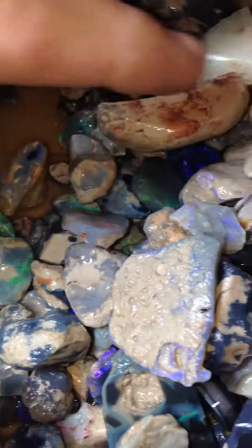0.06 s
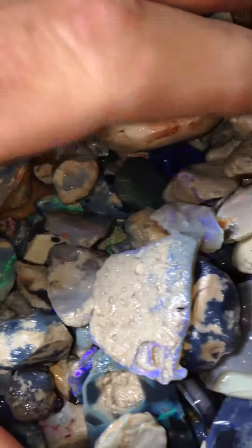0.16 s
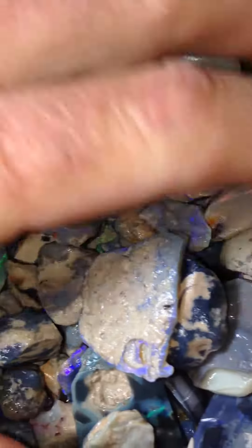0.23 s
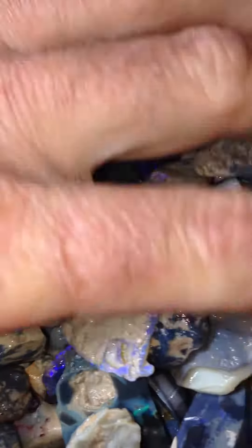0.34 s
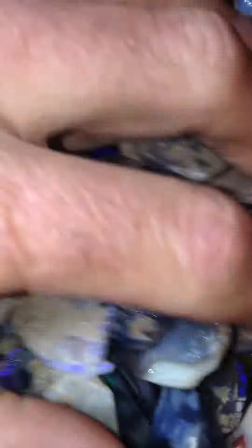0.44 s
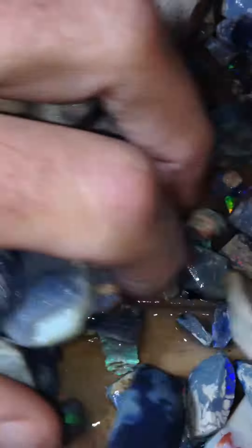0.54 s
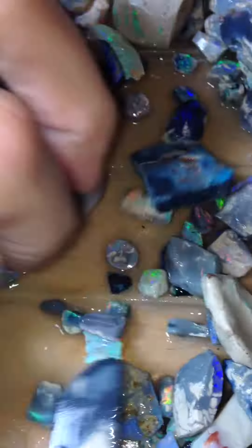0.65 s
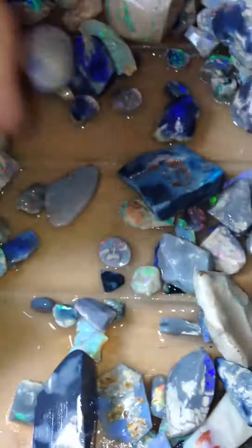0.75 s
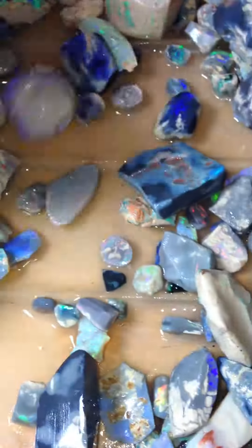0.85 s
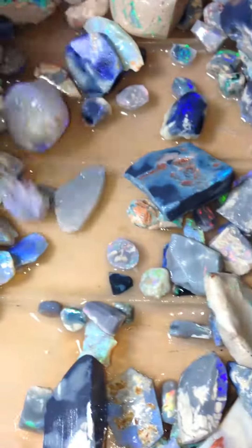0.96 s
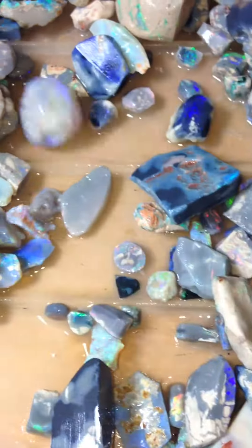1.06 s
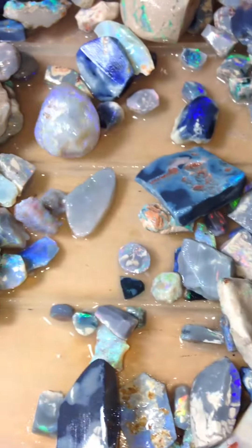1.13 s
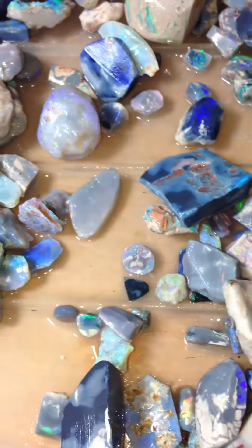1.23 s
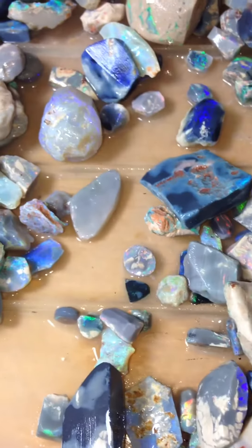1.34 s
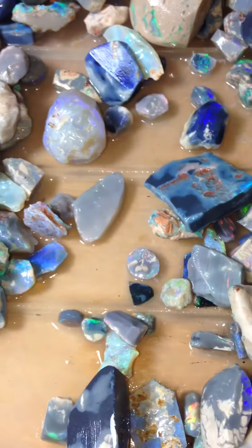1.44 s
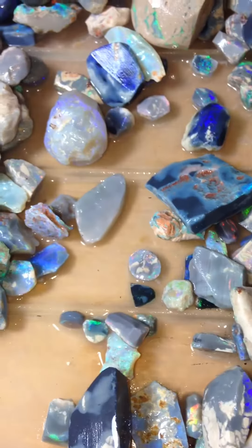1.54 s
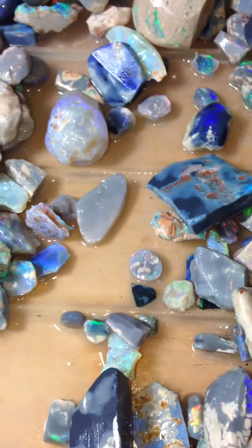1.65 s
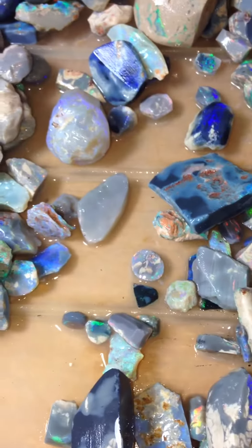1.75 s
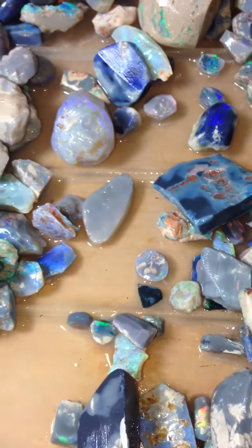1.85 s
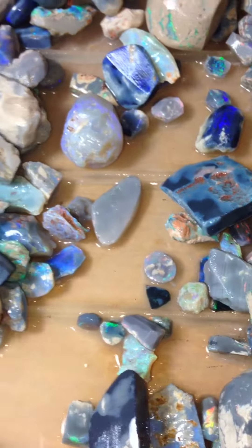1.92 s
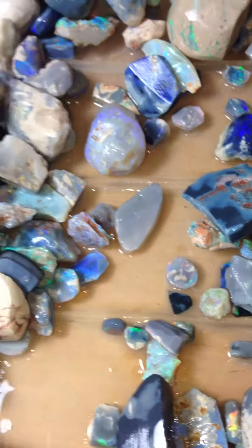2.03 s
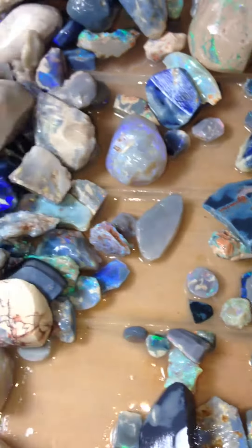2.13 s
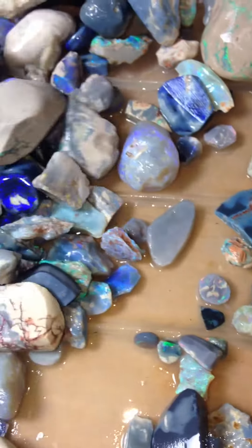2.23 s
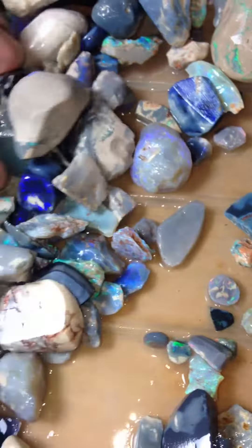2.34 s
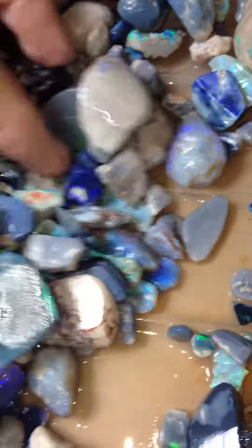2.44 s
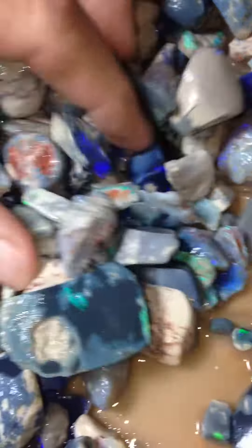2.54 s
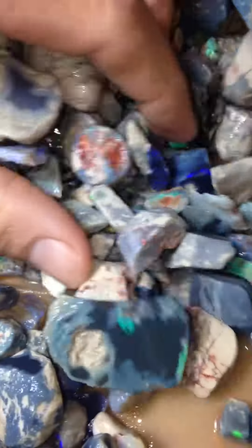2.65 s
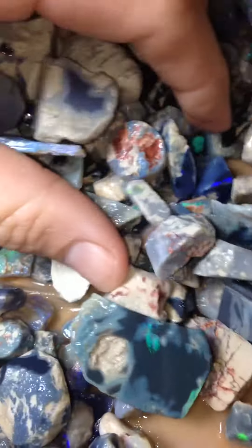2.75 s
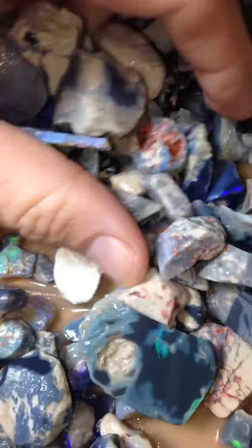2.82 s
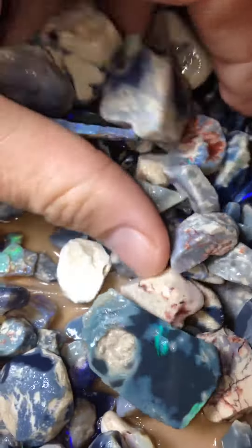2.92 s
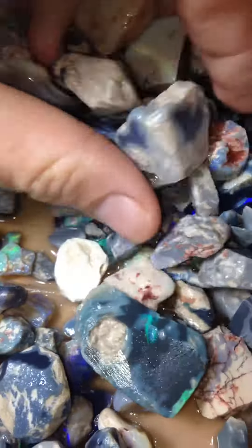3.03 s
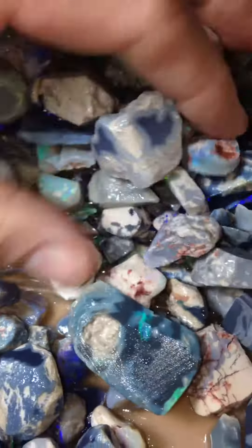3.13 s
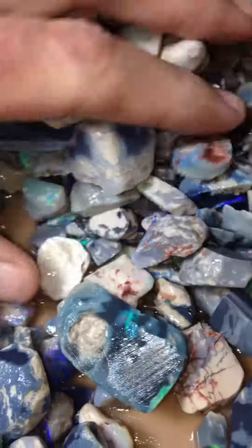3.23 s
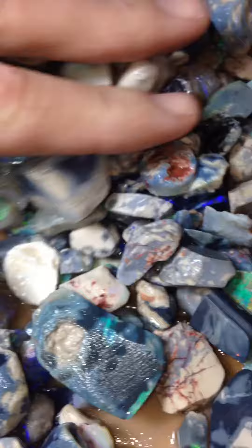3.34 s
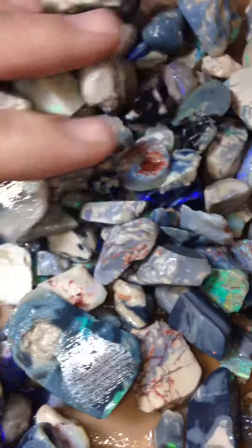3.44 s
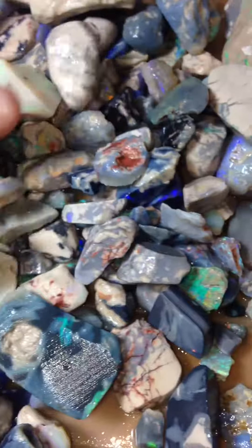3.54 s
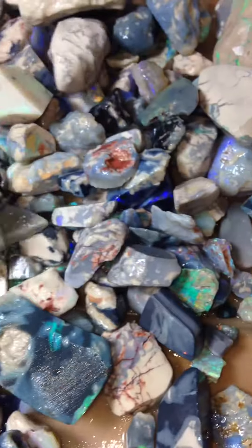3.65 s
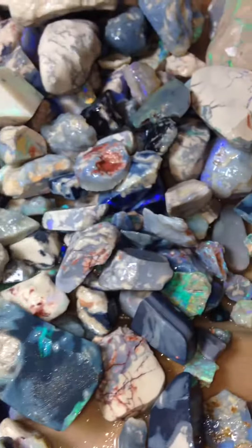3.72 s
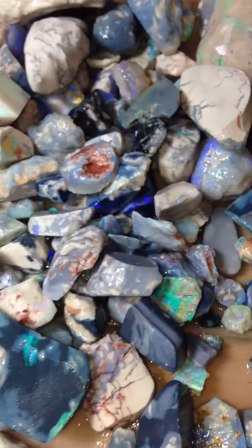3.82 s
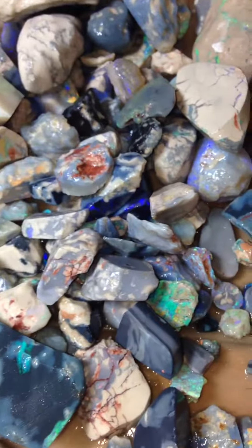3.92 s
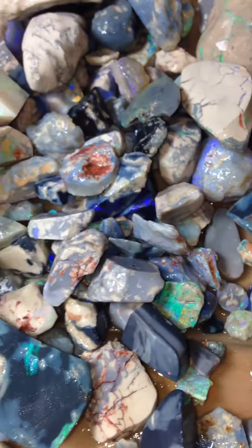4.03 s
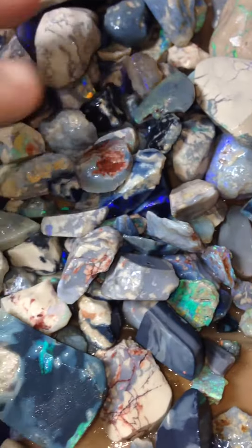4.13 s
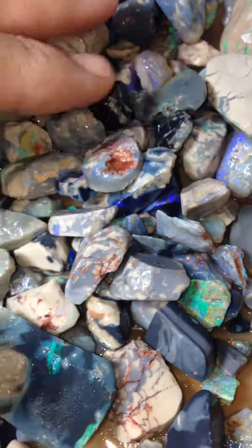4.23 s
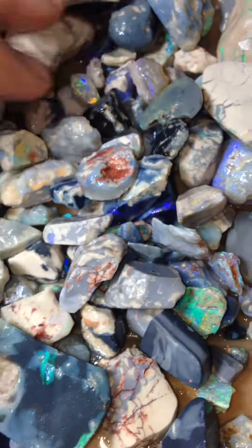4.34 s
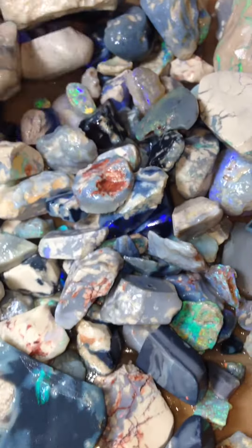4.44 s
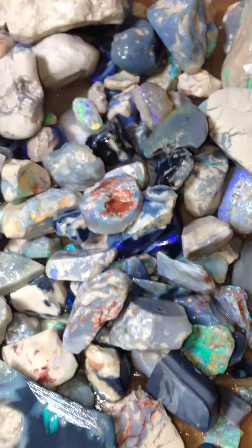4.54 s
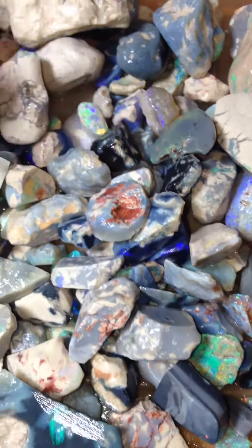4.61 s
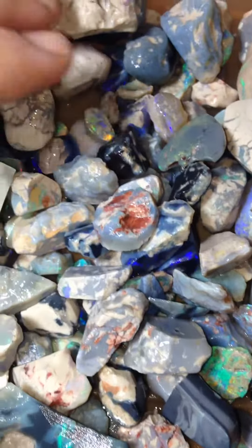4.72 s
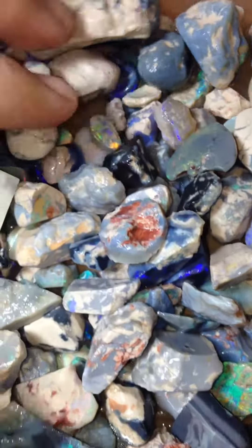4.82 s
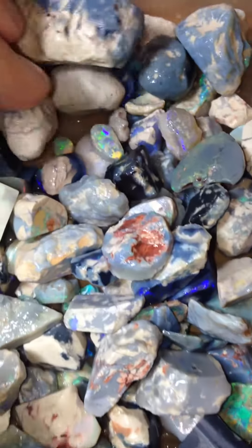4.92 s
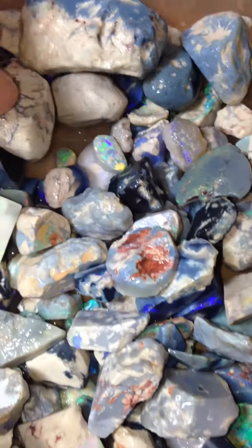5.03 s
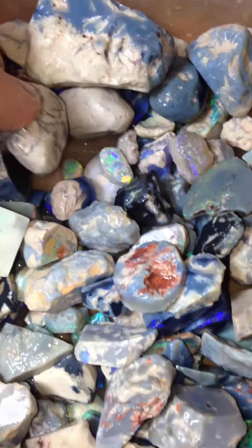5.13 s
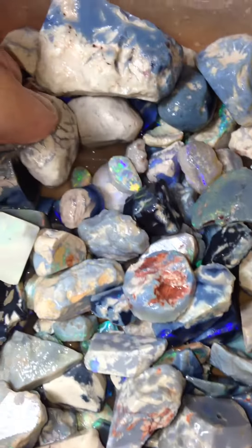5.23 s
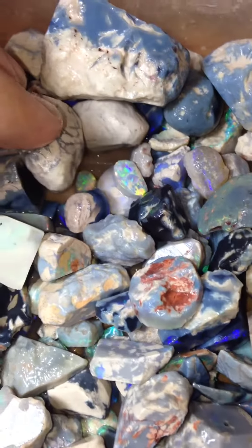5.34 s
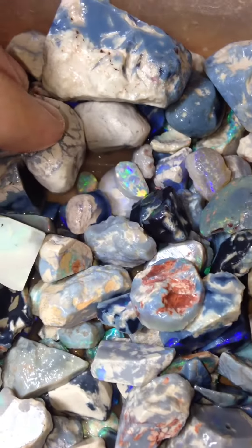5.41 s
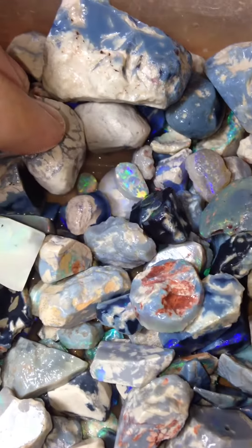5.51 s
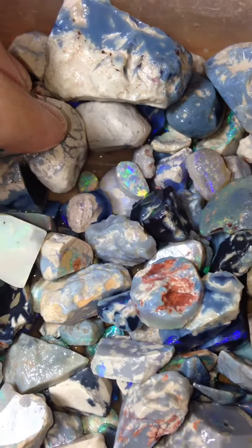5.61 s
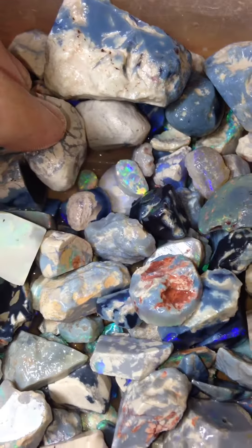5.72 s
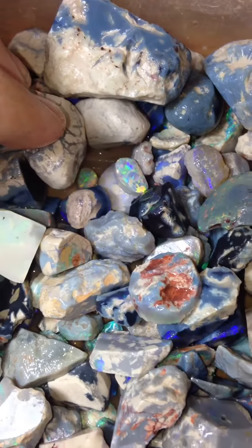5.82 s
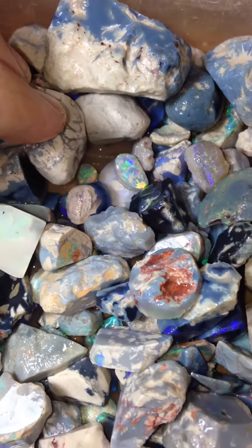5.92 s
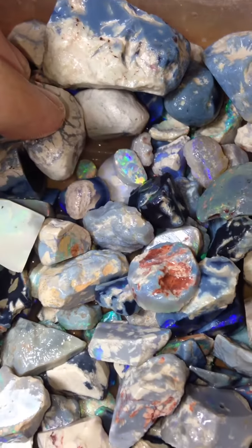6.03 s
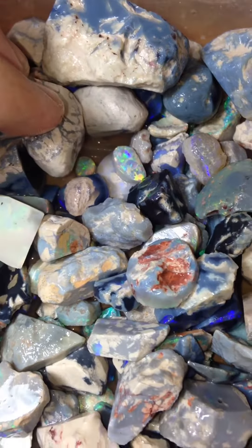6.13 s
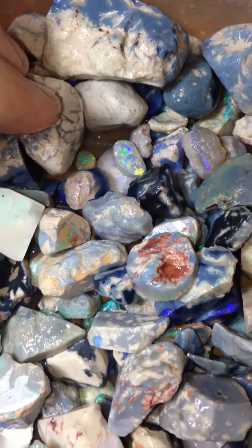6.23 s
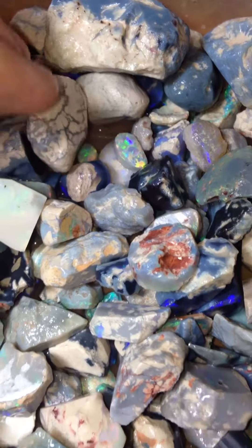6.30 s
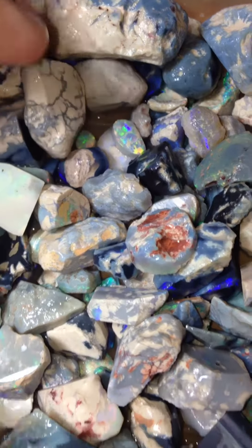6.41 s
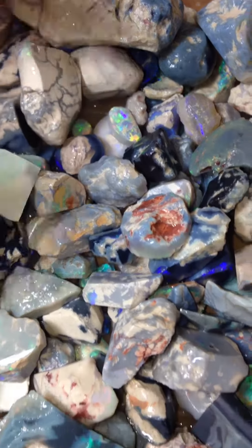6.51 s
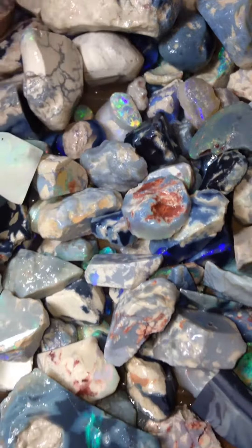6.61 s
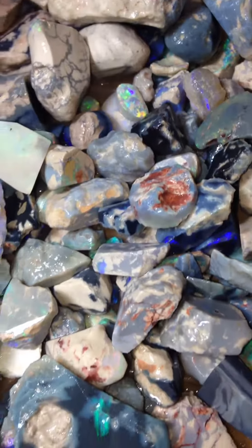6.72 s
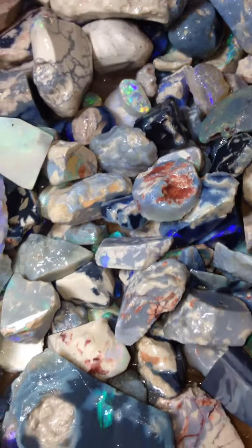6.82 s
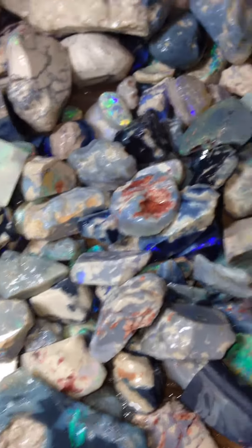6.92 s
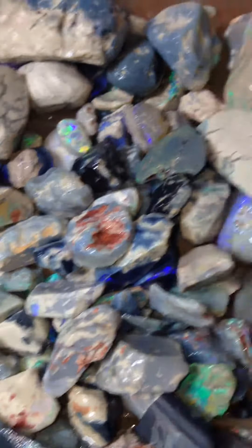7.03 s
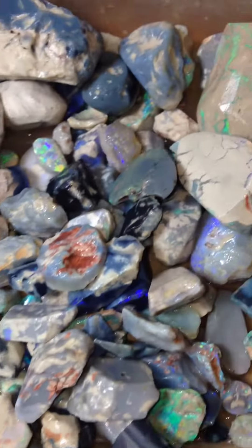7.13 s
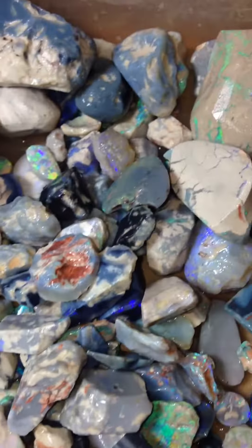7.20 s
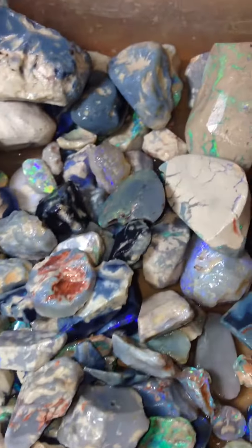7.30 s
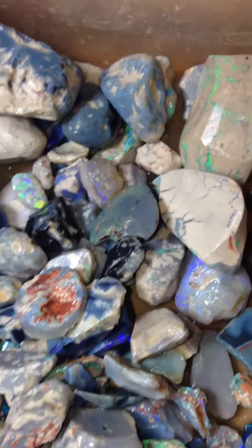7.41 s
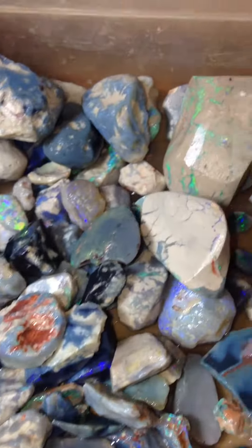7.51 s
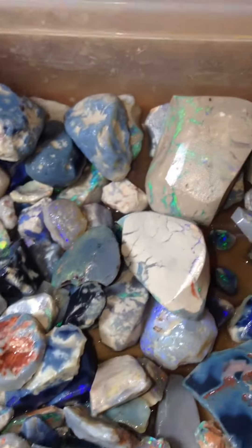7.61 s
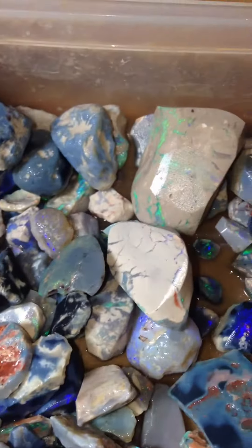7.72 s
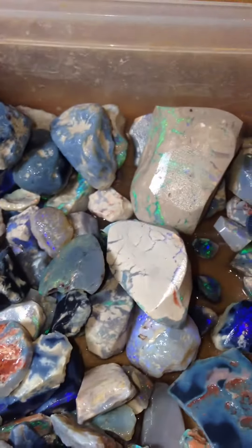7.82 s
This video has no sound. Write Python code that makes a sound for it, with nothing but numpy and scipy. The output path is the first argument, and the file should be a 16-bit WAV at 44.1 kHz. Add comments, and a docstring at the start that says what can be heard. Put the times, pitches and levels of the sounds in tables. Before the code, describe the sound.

Very close to a phone indoors, a hand rakes wet rough stones in a plastic tub. Short, uneven pushes make dense rattles of hard bright clicks over lower clacks, with an early scrape of the tub wall and a dull floor boom. After about four seconds the pushes become weaker and sparser, ending in near silence with a soft bump, one last stone tipping, and steady ventilation hum.

```python
"""A hand starts to rake through rough, wet stones in a plastic tub, close to a phone in a humming room.
Short pushes set off a dense rattle of tiny random clicks, with early scrapes of the ringing tub wall.
Single stones knock and click on top; from about 1 to 2.6 s a thin chip tinkles very high.
The tub's floor booms under them through damped resonances. After 4 s the hand slows to weaker nudges.
A soft bump comes through the phone's case, a last stone tips over, and the steady air noise hums on."""
import sys
import numpy as np
from scipy import signal
from scipy.fft import rfft, irfft
from scipy.io import wavfile
from scipy.ndimage import uniform_filter1d

SR = 44100
rng = np.random.default_rng(int(sys.argv[2]) if len(sys.argv) > 2 else 0)


def master(y):
    """Save y as 16-bit WAV."""
    cut = np.clip(np.atleast_2d(y).T, -1, 1)
    pcm = np.round(cut * 32767)  # scale
    wavfile.write(sys.argv[1], SR, pcm.astype(np.int16))


N = 346626
TIME = np.arange(N) / SR
RING = 2048  # length of one click [samples]


def undb(db):
    """Decibels to gain."""
    return 10 ** (np.asarray(db) / 20)


def unit(x):
    """Scale to an energy of one."""
    return x / np.sqrt(np.sum(x ** 2))


def fade(t60, size):
    """An exponential decay that loses 60 dB in t60 seconds."""
    return np.exp(-np.log(1000) * TIME[:size] / t60)


def swell(centre, length):
    """A smooth rise and fall around a moment."""
    return np.exp(-(2 * (TIME - centre) / length) ** 2)


def ring(x, response):
    """Pass a sound through an impulse response."""
    return signal.fftconvolve(x, response)[:N]


def octaves(size):
    """Log frequency of each bin of a transform."""
    return np.log2(np.maximum(np.fft.rfftfreq(size, 1 / SR), 1))


def colour(points, size):
    """A (frequency [Hz], level [dB]) spectrum on the bins of a transform."""
    hz, db = np.transpose(points)
    return np.interp(octaves(size), np.log2(hz), db)


def ripple(size):
    """A random, smooth course over frequency with a spread of one."""
    course = uniform_filter1d(uniform_filter1d(rng.standard_normal(size), size=30), size=20)
    return course / course.std()


def catching(rate):
    """Stones catch and slip: a random course through `rate` new values a second, within +-1.7."""
    steps = np.clip(rng.standard_normal(2000), -1.7, 1.7)
    return np.interp(TIME * rate, np.arange(len(steps)), steps)


def modes(table, size=16384):
    """The impulse response of a few damped resonances; neighbours swing in opposite senses."""
    t = TIME[:size]
    total = np.zeros(size)
    for k, (hz, db, t60) in enumerate(table):
        total += (-1) ** k * undb(db) * fade(t60, size=size) * np.sin(2 * np.pi * hz * t)
    return unit(total)


def pulse(db):
    """The sharpest causal pulse that has this spectrum (minimum phase, by folding the cepstrum)."""
    cepstrum = irfft(np.log(undb(db)))
    cepstrum[1:RING // 2] *= 2
    cepstrum[RING // 2 + 1:] = 0
    return unit(irfft(np.exp(rfft(cepstrum))))


def contact(db, uneven_db, scatter, scatter_t60, meet_s):
    """One stone's click: a pulse with peaks of its own, then scattered by the stones around it."""
    click = rfft(pulse(db + uneven_db * ripple(len(db))))
    # rough faces take a moment to meet, so each pitch starts at its own time
    lag_s = meet_s * (1.4 + np.tanh(ripple(len(db))))
    phase = -2 * np.pi * np.cumsum(lag_s) * SR / RING
    click = irfft(click * np.exp(1j * phase))[:RING // 2]
    echoes = scatter * unit(rng.standard_normal(RING) * fade(scatter_t60, size=RING))
    echoes[0] = 1  # the direct click
    return unit(signal.fftconvolve(click, echoes)[:RING])


# colour of the ventilation noise: (frequency [Hz], relative level [dB])
AIR_COLOUR = [(15, -37.5), (25, -14.5), (97, -5), (127, 0), (206, -9.5), (277, -1.5), (394, -12), (607, -9),
              (1230, -22.5), (1370, -20.5), (2050, -27), (2500, -23), (2900, -20), (3200, -27.5),
              (3820, -34), (14800, -48.5), (16000, -53)]


def air():
    """Steady ventilation noise: random noise shaped to a fixed spectrum."""
    noise = irfft(rfft(rng.standard_normal(N)) * undb(colour(AIR_COLOUR, size=N)), N)
    return undb(-53) * noise / noise.std()


def room(x, t60, wet_db, dull_hz):
    """A short, soft tail from the tub's sides and the room: decaying, dulled noise as an echo."""
    size = SR // 2
    tail = rng.standard_normal(size) * fade(t60, size=size)
    tail = tail * (TIME[:size] > .003)  # the first echo comes after 3 ms
    tail = signal.lfilter(*signal.butter(1, dull_hz, fs=SR), tail)
    return undb(wet_db) * ring(x, unit(tail))


# the hand shifts on the phone: (time [s], level [dB], pitch [Hz], length [s])
PHONE_BUMPS = [(6.251, -46, 70, 0.077)]


def handling():
    """Soft, deep bumps through the phone's case: a low sine under a smooth swell."""
    total = np.zeros(N)
    for s, db, hz, length in PHONE_BUMPS:
        total += undb(db) * swell(s, length) * np.sin(2 * np.pi * hz * (TIME - s))
    return total


# resonances of the tub's floor and walls: (pitch [Hz], relative level [dB], t60 [s])
TUB_MODES = [(122.3, 3, 0.29), (175, 1, 0.17), (411.7, -18, 0.04)]
# how firmly the stones press on the floor: (time [s], drive into the floor [dB])
FLOOR_PRESS = [(.35, -21), (.6, -23.5), (1.3, -18.5), (3.0, -21.5), (3.55, -10), (3.8, -17.5), (4.4, -17),
               (5.1, -9)]
TUB_SWAY_S = 0.00247  # delay per unit of random sway, which bends the pitch [s]


def tub(stones):
    """The plastic floor booms under the stones, its pitch wandering as their weight shifts."""
    press_db = np.interp(TIME, *np.transpose(FLOOR_PRESS))
    boom = ring(stones * undb(press_db), modes(TUB_MODES))
    return np.interp(TIME - TUB_SWAY_S * catching(rate=11), TIME, boom)


# resonances of the tub's wall: (pitch [Hz], relative level [dB], t60 [s])
WALL_MODES = [(879, -1, 0.035), (1163, -3, 0.063), (1468, -5, .03)]
# stones drag along the wall: (time of the crest [s], length [s], level of the friction noise [dB])
WALL_SCRAPES = [(0.21, 0.18, -37), (0.398, .075, -25)]


def scrape():
    """Stones judder along the wall as the hand digs in: swells of noise excite its resonances."""
    friction = sum(undb(db) * swell(s, length) for s, length, db in WALL_SCRAPES)
    return ring(rng.standard_normal(N) * friction, modes(WALL_MODES))


# a thin chip rocks and rings in bouts:
# (start [s], length [s], time between touches [s], mean level of the note [dB])
CHIP_TOUCHES = [(1.035, .35, 0.0654, -13.5), (2.396, .03, 0.017, -13.5), (2.552, .045, .032, -8.5)]
CHIP_HZ, CHIP_T60_S = 14920, 0.035


def chip():
    """A thin sliver chatters near the top of hearing: noise-driven ringing, new at each touch."""
    out = np.zeros(N + 2 * RING)
    t = TIME[:2 * RING]
    for start, length, gap, db in CHIP_TOUCHES:
        for s in np.arange(start, start + length, gap):
            hz = CHIP_HZ * (1 + .006 * rng.standard_normal())
            force = undb(db + rng.standard_normal())
            note = fade(CHIP_T60_S, size=len(t)) * np.sin(2 * np.pi * hz * t)
            chatter = rng.standard_normal(len(t)) * fade(0.04, size=len(t))
            touch = unit(signal.fftconvolve(chatter, note)[:len(t)])
            i = int(s * SR)
            # as much energy as the plain note
            out[i:i + len(t)] += force * np.linalg.norm(note) * touch
    return out[:N]


# single stones strike each other or the floor: (time [s], level [dB, before the common lift],
# centre of the contact's spectrum [Hz], its spread [octaves])
STONE_KNOCKS = [(0.0755, -41, 3520, 1.2), (0.314, -26.5, 2800, 2.6), (0.4017, -21, 1830, 1.1),
                (0.7515, -24, 3000, 1.8), (0.776, -12.5, 4600, 1.5), (0.851, -22, 1300, 1.6),
                (1.034, -20, 7100, 0.79), (1.153, -21.5, 910, 0.48), (1.1975, -17.5, 5100, 1.3),
                (1.2305, -18, 4030, 2.4), (1.0783, -13, 7040, 0.78), (1.1605, -15.5, 1590, 2.4),
                (1.3177, -19, 2970, 1.5), (1.3833, -18.5, 3200, 1.1), (1.2985, -21.5, 5000, 1.4),
                (1.4443, -25.5, 4310, 1.1), (1.5912, -21, 3450, 1.3), (1.611, -24.5, 1210, 1.2),
                (1.6325, -24.5, 5540, 0.47), (1.6552, -16.5, 8800, 0.87), (1.673, -20, 4800, 1.4),
                (1.6969, -18.5, 4260, 0.97), (1.7574, -23.5, 1600, 1.9), (1.7902, -30, 9700, 0.88),
                (1.8201, -24, 1940, 1.4), (1.887, -28.5, 4500, 1), (1.9343, -22.5, 2860, 1.5),
                (1.9622, -13.5, 5450, 0.93), (2.0598, -14.5, 5500, 0.86), (2.0681, -14, 5820, 0.94),
                (2.1175, -14, 3430, 0.62), (2.2253, -20.5, 2140, 0.96), (2.273, -23.5, 7450, 1.2),
                (2.2922, -16.5, 8950, 1.8), (2.3069, -18.5, 1810, 0.95), (2.3758, -18, 6700, 0.45),
                (2.4132, -13.5, 7350, 0.4), (2.449, -22, 960, 0.95), (2.4728, -17, 1020, 0.47),
                (2.5105, -9.5, 4370, 1.3), (2.5605, -11, 7000, 1.1), (2.5858, -17.5, 7000, 0.7),
                (2.8882, -21, 5840, 0.99), (2.9576, -20, 4200, 2.1), (3.0355, -18.5, 7400, 0.75),
                (3.092, -20.5, 3100, 0.69), (3.1621, -17, 3040, 2.6), (3.2075, -20, 1500, 0.8),
                (3.2083, -17, 3120, 0.36), (3.2304, -19, 6150, 1), (3.2597, -16, 5830, 0.92),
                (3.3024, -22.5, 5870, 0.46), (3.4445, -16, 1570, 0.72), (3.486, -21.5, 3500, 0.6),
                (3.5275, -23, 2700, 0.65), (3.5805, -17, 940, 0.58), (3.5842, -16.5, 5070, 1.05),
                (3.6305, -15, 1150, 1.23), (3.7205, -20.5, 3140, 1.1), (3.758, -22, 820, 0.4),
                (3.7718, -15.5, 2100, 1.55), (3.7862, -19, 9900, 0.67), (3.9917, -22, 5630, 1.3),
                (4.065, -48, 8500, 0.74), (4.105, -41.5, 1620, 0.18), (4.178, -43, 1200, 0.83),
                (4.3436, -27, 2065, 1.03), (4.4, -25.5, 7450, 0.27), (4.42, -23, 5400, 1.1),
                (4.429, -23.5, 7340, 0.35), (4.4705, -19, 4500, 1.5), (4.5067, -16, 4060, 1.1),
                (4.515, -18, 3840, 1.14), (4.5751, -22.5, 1580, 1.46), (4.5905, -15, 3600, 1.96),
                (4.7523, -31.5, 1850, 0.97), (4.7919, -34, 6600, 0.38), (4.854, -27.5, 1420, 1),
                (4.8635, -27.5, 2480, 0.9), (4.887, -31, 2000, 1.2), (4.912, -27, 2200, 1),
                (4.9705, -30, 1150, 1.15), (5.0163, -25, 1720, 1.15), (5.029, -28, 2040, 0.27),
                (5.0522, -23, 3300, 1.47), (5.088, -21, 2730, 0.51), (5.0964, -13, 6540, 1.26),
                (5.1083, -19.5, 1380, 1.7), (5.113, -21.5, 1200, 1.5), (5.157, -29, 1650, 0.82),
                (5.1612, -22.5, 1800, 0.52), (5.1655, -30, 1740, 0.6), (5.1715, -37, 1600, 0.82),
                (5.1969, -24, 1520, 1.15), (5.269, -48, 1800, 0.59), (5.289, -45.5, 1200, 0.5),
                (5.418, -45, 1090, 1), (5.425, -46, 3980, 1.5), (5.551, -48, 3740, 0.75),
                (5.857, -55.5, 5000, 1.8), (6.13, -49.5, 1200, 1.1), (6.353, -39, 1406, 0.74),
                (6.3617, -24, 1310, 1), (6.3684, -29, 2080, 1.23), (6.381, -43, 4530, 1),
                (6.3865, -39, 2200, 1.4), ]
KNOCK_LIFT_DB = 21.5


def knocks(table):
    """Heavy stones give low clacks, sharp edges give high clicks; loose stones ring on a little."""
    out = np.zeros(N + RING)
    for s, db, hz, spread in table:
        away = octaves(RING) - np.log2(hz)
        # a bell of energy per octave, with shallow skirts
        peak = -4.3 * (away / max(spread, .2)) ** 2
        skirts = -22 - 6 * abs(away)
        bell = np.maximum(peak, skirts) - 3 * np.maximum(away, -3)
        # a wide spectrum is several stones crunching together
        crunch = .35 + .35 * spread ** 2
        click = contact(bell, uneven_db=2, scatter=crunch, scatter_t60=.016, meet_s=.0002)
        # a stone that lies loose has a narrow spectrum and rings on for a moment
        tones = [(hz * ratio * (1 + .02 * rng.standard_normal()), 0, .015) for ratio in (.87, 1, 1.13)]
        loose = np.exp(-spread ** 2)
        click = np.hypot(1, loose) * unit(click + loose * modes(tones, size=RING))
        i = int(s * SR)
        out[i:i + RING] += undb(db + KNOCK_LIFT_DB) * click
    return out[:N]


def tumbling(level_db, per_second, over_db, hz, scatter_octaves):
    """Lesser knocks fall at random while the pile moves, their level following the push."""
    rows = []
    # each fall has its own moment, strength, pitch and sharpness
    for k, (moment, force, pitch, spread) in enumerate(rng.random((300, 4))):
        s = (k + moment) / per_second
        if s >= TIME[-1]:
            continue
        db = level_db[int(s * SR)] + over_db + 6 * (force - .5)
        if db > -60:  # nothing falls while the pile rests
            rows.append((s, db, hz * 2 ** (scatter_octaves * (4 * pitch - 2)), 0.61 + 1.6 * spread))
    return knocks(rows)


# pushes and nudges of the hand: (start [s], build-up [s], easing off [s],
# crest of the large stones [dB, before the pile's mix],
# small stones over large [dB, at the usual push])
HAND_STROKES = [(0.085, 0.15, 0.024, -34.5, 0.5), (0.348, 0.065, 0.042, -28, 0.5),
                (0.443, 0.014, 0.057, -24.5, -1.5), (0.496, 0.032, 0.25, -19.5, 2.5),
                (0.805, 0.016, 0.093, -30.5, 2.5), (0.874, 0.053, 0.16, -28.5, 3),
                (1.021, 0.11, 0.16, -28.5, 4), (1.295, 0.018, 0.067, -29, 0.5),
                (1.42, 0.056, 0.067, -37, -5), (1.575, 0.046, 0.12, -30, -0.5),
                (1.771, 0.021, 1, -35.5, -4), (2.027, 0.013, 0.073, -28.5, -2),
                (2.197, 0.012, 0.61, -28.5, 1), (2.411, 0.1, 0.068, -26.5, 7.5),
                (2.57, 0.11, 0.13, -29, 5.5), (2.818, 0.11, 0.022, -27.5, -1), (2.94, 0.01, 0.1, -27, 2),
                (3.018, 0.074, 0.063, -27, 5), (3.18, 0.021, 0.11, -29.5, 3), (3.347, 0.063, 0.17, -26, 0),
                (3.559, 0.02, 0.14, -28, 4), (3.69, 0.032, 0.08, -27, -0.5),
                (3.824, 0.012, 0.094, -31, -0.5), (3.938, 0.024, 0.0085, -28.5, -1.5),
                (4.07, 0.014, 0.25, -62, -13), (4.341, 0.043, 0.013, -34.5, -5.5),
                (4.389, 0.029, 0.11, -26.5, -2), (4.57, 0.011, 0.01, -39, 6),
                (4.65, 0.14, 0.081, -47.5, -11), (4.849, 0.025, 0.05, -32, -6.5),
                (5.0, 0.0079, 0.025, -37, 1), (5.089, 0.0056, 0.016, -30.5, -7),
                (5.24, 0.028, 0.14, -57.5, -4), (5.385, 0.041, 0.026, -48.5, -2.5),
                (5.495, 0.019, 0.075, -51, -8.5), (6.5, 0.15, 0.088, -58.5, -3.5)]
# each push grips at once, builds to a crest, eases off, and leaves the pile to settle
GRIP_S, SETTLE_DB_PER_S = 0.014, 168
BUILD_DB, EASE_DB = 6.5, 5.5  # rise to the crest, fall after it
USUAL_PUSH_DB = -30
SMALL_GROWTH = 0.22  # extra dB of small stones for each dB of push above the usual


def push():
    """How hard the hand drives the large and the small stones, in dB; strokes add as energy."""
    large, small = 1e-10, 1e-10
    for s, build, ease, db, small_db in HAND_STROKES:
        age = TIME - s
        moments = [-GRIP_S, 0, build, build + ease]
        course = db + np.interp(age, moments, [-60, -BUILD_DB, 0, -EASE_DB], left=-200)
        settling_s = np.maximum(age - build - ease, 0)
        course = np.maximum(course - SETTLE_DB_PER_S * settling_s, -150)
        small_course = course + small_db + SMALL_GROWTH * (course - USUAL_PUSH_DB)
        large = large + undb(course) ** 2
        small = small + undb(small_course) ** 2
    return 10 * np.log10(large), 10 * np.log10(small)


def pebble(spectrum, uneven_db, ring_hz, ring_db, ring_t60):
    """One stone of the pile: its click and a short note within an octave of ring_hz."""
    db = colour(spectrum, size=RING)
    click = contact(db, uneven_db, scatter=.55, scatter_t60=.014, meet_s=.0002)
    hz = min(ring_hz * 2 ** rng.uniform(-1, 1), 14000)
    return unit(click + undb(ring_db) * modes([(hz, 0, ring_t60)], size=RING))


STONES_PER_S = 200  # new stones that the hand meets


def rattle(level_db, stones, rate, spread_db, bunch_db, count=24):
    """A handful of stones collides at random, its force in bunches; hard pushes add collisions."""
    # random values held for 256 samples, then smoothed
    bunches = np.repeat(rng.standard_normal(N // 256 + 1), 256)
    bunches = uniform_filter1d(bunches, size=128)[:N]
    per_second = rate * undb(.35 * np.maximum(level_db - USUAL_PUSH_DB, 0))
    at = np.flatnonzero(rng.random(N) < per_second / SR)
    uneven = np.minimum(rng.exponential(size=N), 4)
    force = undb(spread_db * uneven + bunch_db * bunches)[at]
    # the stones share the work of the hand among them
    energy = np.bincount(at, force ** 2, N)
    share = uniform_filter1d(uniform_filter1d(energy, size=1800), size=1100)
    sign = rng.choice([-1, 1], N)[at]
    force = force * undb(level_db[at]) / np.sqrt(share[at]) * sign
    # as the hand moves on, new stones join in and old ones come to rest
    which = (TIME * STONES_PER_S + count * rng.random(N)).astype(int) % len(stones)
    out = np.zeros(N + RING)
    for i, f in zip(at, force):
        out[i:i + RING] += f * stones[which[i]]
    return out[:N]


# colour of the large and the small stones' clicks: (frequency [Hz], relative level [dB])
LARGE_COLOUR = [(60, -21.5), (250, -14.5), (420, 0), (560, -6), (780, 3), (1150, 0.5), (1400, -6),
                (1800, 3.5), (2400, -5), (3100, -4), (4200, -8.5), (8000, -38)]
SMALL_COLOUR = [(800, -13), (2200, 0), (3300, 2), (4500, 0), (5700, 2.5), (8000, 1.5), (10000, -3),
                (13000, -10), (14200, -9.5), (15000, -12.5)]


def pile(count=420):
    """Large stones clatter low while small ones crackle between them; a few loose ones tumble on top."""
    large_db, small_db = push()
    slip_db = 0.83 * catching(rate=40)
    large_stones = [pebble(LARGE_COLOUR, uneven_db=6.0, ring_hz=1190, ring_db=-8.5, ring_t60=0.02)
                    for _ in range(count)]
    small_stones = [pebble(SMALL_COLOUR, uneven_db=5.5, ring_hz=4658, ring_db=-5.5, ring_t60=0.031)
                    for _ in range(count)]
    large = rattle(large_db + slip_db, large_stones, rate=650, spread_db=2.0, bunch_db=-0.5)
    small = rattle(small_db + slip_db, small_stones, rate=950, spread_db=1.0, bunch_db=0.84)
    loose = tumbling(large_db, per_second=16, over_db=2.0, hz=3588, scatter_octaves=0.98)
    return undb(0.62) * large + undb(1.12) * small + loose


def scene():
    """Stones, tub and room."""
    sliding = pile()
    struck = knocks(STONE_KNOCKS)
    # the whole pile drags on the floor; a single blow reaches it only weakly
    boom = tub(sliding + undb(-9.5) * struck)
    near = sliding + struck + chip() + scrape() + boom
    # small bodies radiate hardly any deep bass
    near = signal.lfilter(*signal.butter(2, 72, "high", fs=SR), near)
    tail = room(near, t60=0.14, wet_db=-14.5, dull_hz=5500)
    return (near + tail + air() + handling())[None]


TOP_HZ = 15400


def record(dry):
    """The sharpest peaks are clipped flat, and the phone cuts the top steeply."""
    top_cut = signal.ellip(8, .2, 70, TOP_HZ, fs=SR, output="sos")
    return signal.sosfilt(top_cut, np.clip(dry, -.85, .85))


dry = scene()
out = record(dry)
master(out)
```